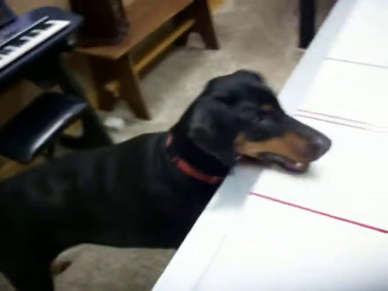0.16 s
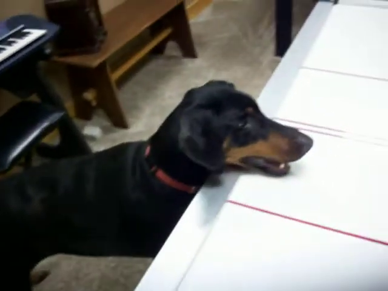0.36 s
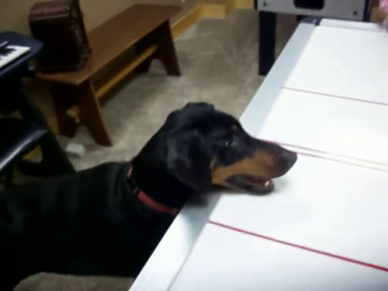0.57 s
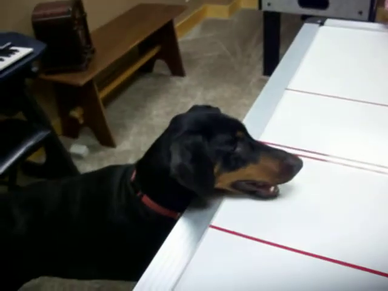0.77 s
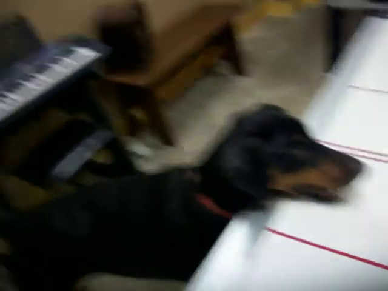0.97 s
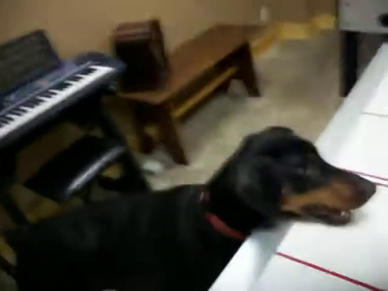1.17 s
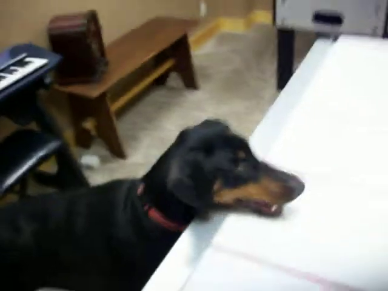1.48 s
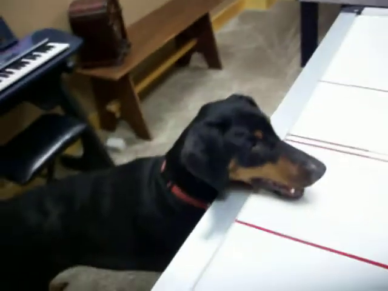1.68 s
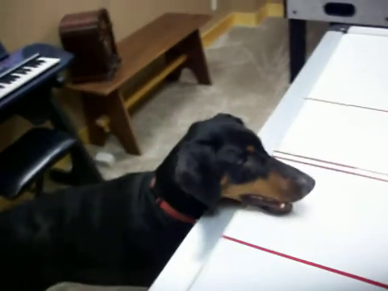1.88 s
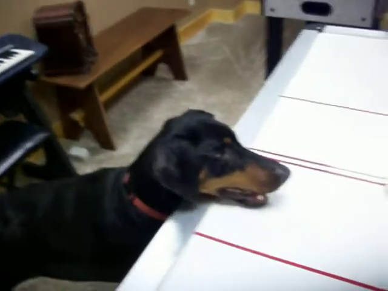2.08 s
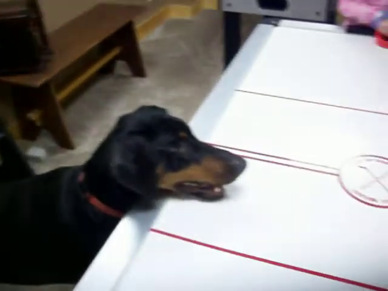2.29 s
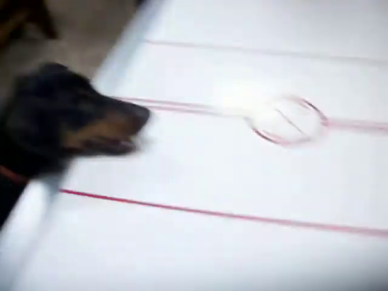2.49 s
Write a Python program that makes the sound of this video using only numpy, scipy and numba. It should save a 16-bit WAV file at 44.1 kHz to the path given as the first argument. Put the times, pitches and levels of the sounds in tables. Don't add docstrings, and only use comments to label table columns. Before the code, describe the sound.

An air hockey puck knocks hard on table rails. A fading knock opens, then a sharp hit at 0.4 seconds, a bright knock with low thud at 1.0, and the loudest crack at 1.2. A duller knock follows at 1.55, a bright one with rebound at 2.0, then faint ticks and bumps. Steady blower hum dips under short echoes; the small microphone distorts and lacks treble.

```python
import sys
import numpy as np
from scipy import signal
from scipy.fft import rfft, irfft
from scipy.io import wavfile
from scipy.ndimage import uniform_filter1d
from numba import njit

SR = 44100
rng = np.random.default_rng(int(sys.argv[2]) if len(sys.argv) > 2 else 0)


def boost(x):
    u = np.asarray(x, float) / 20
    return 10 ** u


def wav_record(signal):
    frames = np.transpose(np.atleast_2d(signal))
    bounded = np.clip(frames, -1, 1)
    quanta = np.round(bounded * 32767).astype(np.int16)
    wavfile.write(sys.argv[1], SR, quanta)


N = 115983


def set_rms(x, db):
    return x * boost(db) / np.sqrt(np.mean(x ** 2))


def shaped(x, gain):
    hz = np.fft.rfftfreq(len(x), 1 / SR) + 1
    return irfft(rfft(x) * gain(hz), len(x))


def walk(rate_hz):
    hold = int(SR / rate_hz)
    steps = np.repeat(rng.standard_normal(N // hold + 1), hold)
    return uniform_filter1d(uniform_filter1d(steps, hold), hold)[:N]


def knock(bright_hz, octaves, top_db):
    # frequency in Hz, level in dB, t60 in seconds; the last is the top ring.
    modes = [(300, 4, 0.017), (500, -1, 0.0083), (694, 1.5, 0.012), (862, 3.5, 0.017), (1350, 18.5, 0.02),
             (1600, 24, 0.0043), (2214, -7.5, 0.036), (2220, 22, 0.004), (3078, 11, 0.024),
             (3064, 8, 0.045), (3977, -15, 0.0027), (5400, 22.5, 0.0039), (4400, 0, 0.018)]
    crack_db = 3
    t = np.arange(4000) / SR

    def excitation(hz):
        return np.exp(-.5 * (np.log2(hz / bright_hz) / octaves) ** 2)

    ring = 0
    for k, (hz, db, t60) in enumerate(modes):
        if k < len(modes) - 1:
            gain = boost(db) * excitation(hz)
        else:
            gain = boost(top_db) * excitation((bright_hz + hz) / 2)
        detune = 1 + rng.standard_normal() / 100
        decay = boost(-60 * t / t60 + rng.standard_normal())
        ring = ring + (-1) ** k * gain * np.sin(2 * np.pi * hz * detune * t) * decay

    band = [bright_hz / 2 ** octaves, min(bright_hz * 2 ** octaves, 9000)]
    impulse = 1. * (t == 0)
    crack = signal.sosfilt(signal.butter(3, band, "band", fs=SR, output="sos"), impulse)
    return set_rms(set_rms(ring, 0) + set_rms(crack, crack_db), 0) * np.sqrt(220 / len(t))


def room(room_db):
    t60_low_s, t60_high_s, late_t60_s, late_db = 0.25, 0.24, 0.46, -29
    first_echo_s, build_s, echoes_per_s, contact_s = 0.0049, 0.0013, 3000, 0.004
    strength, lottery, rattle = rng.standard_normal((3, SR // 2))
    t = np.arange(SR // 2) / SR
    density = np.clip(echoes_per_s / SR * (1 + (t / 0.028) ** 2), 0, 1)
    echoes = strength * (np.abs(lottery) < 1.25 * density) / np.sqrt(density)

    def fade(t60):
        return boost(-60 * t / t60) + boost(late_db - 60 * t / late_t60_s)

    low = shaped(echoes, lambda hz: 1 / (1 + (hz / 2000) ** 2))
    tail = low * fade(t60_low_s) + (echoes - low) * fade(t60_high_s)
    tail = tail * np.clip((t - first_echo_s) / build_s, 0, 1)
    contact = rattle * np.exp(-(t / contact_s) ** 2)
    return tail * boost(room_db) / np.sqrt(np.sum(tail ** 2)) + contact / np.sqrt(np.sum(contact ** 2))


def puck():
    # start in seconds, level in dB, brightest pitch in Hz,
    # spread in octaves, top ring in dB.
    rail_hits = [
        (-.05, 7.5, 1600, 1.345, 17.5),
        (.4052, 9.5, 2037, 1.05, 7.5),
        (1.0022, 1.5, 2130, 1.2, 14),
        (1.0340, -9.5, 3356, 0.086, 29),
        (1.1878, 17, 2113, 1.34, 18.5),
        (1.5439, 7, 1600, 1.575, -17),
        (1.614, -13.5, 1590, 0.28, -10),
        (2.0190, 5, 2580, 1.23, -27.5),
        (2.075, -6, 1810, 1.14, -30),
    ]
    # start in seconds, level in dB, brightest pitch in Hz,
    # spread in octaves, top ring in dB.
    soft_hits = [
        (.132, -23.5, 753, .7, -22),
        (1.012, -6.5, 300, 0.38, -30),
        (1.075, -22, 300, 0.26, -30),
        (1.9341, -23.5, 1850, 0.88, 3.5),
        (2.295, -34, 1430, 0.49, 0),
        (2.456, -33, 1470, 0.35, -25),
        (2.538, -22.5, 542, 0.34, -30),
        (2.578, -35.5, 4400, 0.1, 6),
    ]
    lead = 4410
    out = np.zeros(N + lead + SR)
    for hits, room_db in ((rail_hits, 5), (soft_hits, 2.5)):
        for start_s, db, bright_hz, octaves, top_db in hits:
            blow = knock(bright_hz, max(octaves, .1), top_db)
            sound = signal.fftconvolve(blow, room(room_db)) * boost(db)
            i = int(start_s * SR) + lead
            out[i:i + len(sound)] += sound
    return out[lead:lead + N]


def blower():
    # frequency in Hz, density in dB per Hz.
    air_spectrum = [(15, -47), (25, -32.5), (117, -21), (242, -14), (457, -17), (500, -26), (560, -19.5),
                    (1420, -24), (5670, -39), (7370, -99.5), (12500, -120)]
    # centre in Hz, width in Hz, rms level in dB.
    resonances = [
        (63.1, 16, -47),
        (155, 30, -42.5),
        (198, 35, -39),
        (243.5, 33, -46),
        (294.6, 5.3, -39),
        (339, 17, -44),
    ]
    air_db, blade_hz, blade_db = -34, 240.2, -35
    spectrum_hz, spectrum_db = np.array(air_spectrum).T
    air = 0
    for centre in 30 * 2 ** np.arange(0, 8, .5):
        def band_gain(hz):
            bell = np.exp(-(np.log2(hz / centre) / 0.47) ** 2)
            return bell * boost(np.interp(np.log(hz), np.log(spectrum_hz), spectrum_db))

        band = shaped(rng.standard_normal(N), band_gain)
        air = air + band * boost(walk(6.1))
    air = air * boost(air_db) / np.std(shaped(air, lambda hz: hz > 400))

    hum = 0
    for centre, width, db in resonances:
        noise = rng.standard_normal(N)
        hum = hum + set_rms(shaped(noise, lambda hz: 1 / (1 + (2 * (hz - centre) / width) ** 2)), db)

    t = np.arange(N) / SR
    blade = np.sin(2 * np.pi * blade_hz * t + 2.1 * walk(12))
    return air + hum + set_rms(blade, blade_db)


def scene():
    return (puck() + blower())[None]


@njit
def follow(want_db, attack, release_db):
    out, gain_db = np.empty(len(want_db)), want_db[0]
    for i in range(len(want_db)):
        gap = want_db[i] - gain_db
        if gap < 0:
            gain_db += gap * attack
        else:
            gain_db += min(gap, release_db)
        out[i] = gain_db
    return out


def band_limit(x):
    return signal.sosfilt(signal.butter(12, 16300, fs=SR, output="sos"), x)


def record(dry):
    limit_db, sense_s, attack_s, release_db_per_s = -15.5, .012, .003, 300
    input_clip, output_clip, offset = .66, .725, -.007
    size = int(sense_s * SR)
    power = uniform_filter1d(dry[0] ** 2, size, origin=(size - 1) // 2, mode="mirror")
    want_db = np.minimum(limit_db - 10 * np.log10(np.abs(power) + 1e-12), 0)
    x = dry * boost(follow(want_db, 1 / (attack_s * SR), release_db_per_s / SR))
    x = np.clip(x, -input_clip, input_clip)
    x = signal.sosfilt(signal.butter(1, 45, "high", fs=SR, output="sos"), x)
    x = signal.sosfilt(signal.butter(4, 4426, fs=SR, output="sos"), x)
    x = signal.sosfilt(signal.ellip(10, .5, 85, 5883, fs=SR, output="sos"), x) + offset
    return band_limit(np.clip(x, -output_clip, output_clip))


dry = scene()
out = record(dry)
wav_record(out)
```